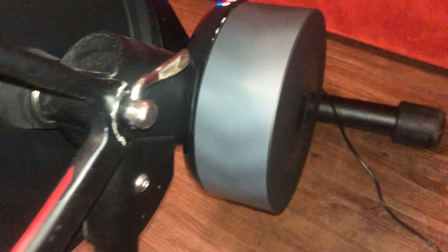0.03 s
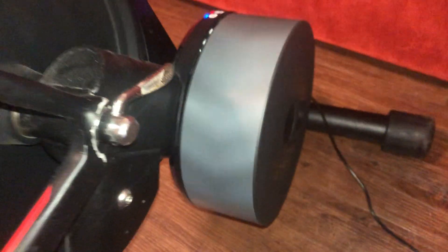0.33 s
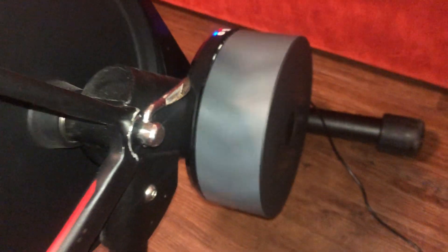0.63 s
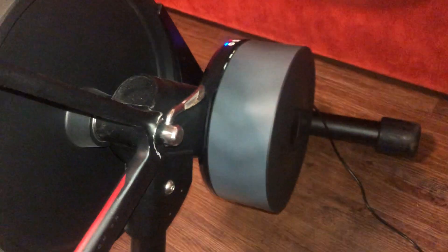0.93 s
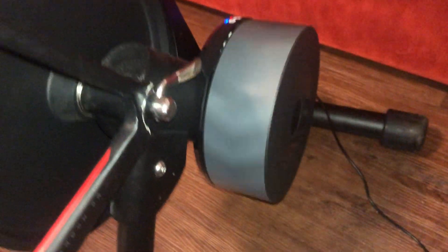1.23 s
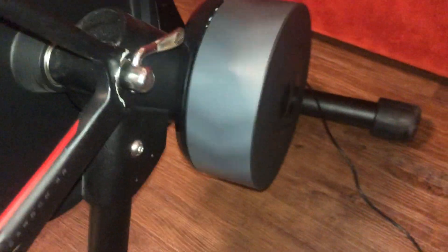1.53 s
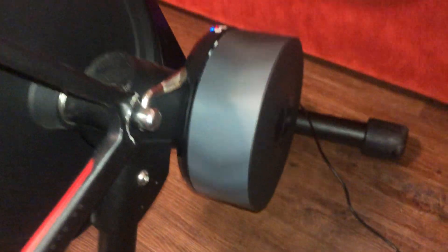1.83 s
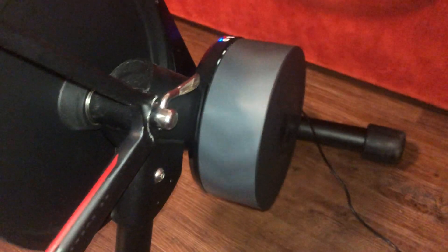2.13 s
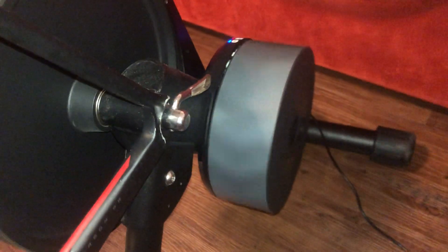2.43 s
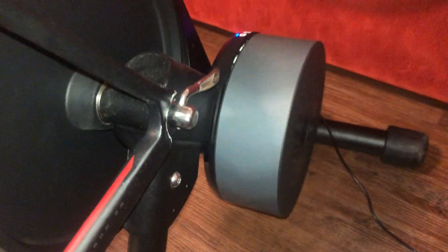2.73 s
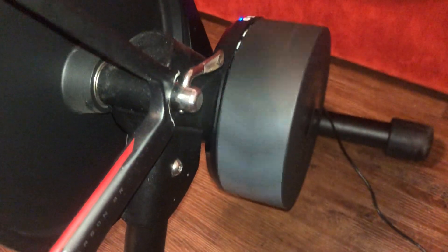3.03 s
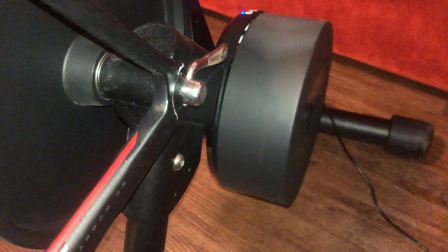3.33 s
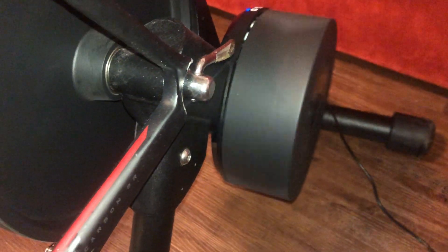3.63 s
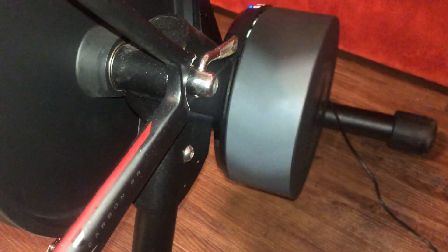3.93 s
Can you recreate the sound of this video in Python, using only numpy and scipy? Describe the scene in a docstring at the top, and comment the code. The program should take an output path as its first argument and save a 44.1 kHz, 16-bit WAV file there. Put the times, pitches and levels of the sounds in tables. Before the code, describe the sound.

Heard up close in a quiet room, a bike trainer flywheel whirs with a rapid, hissing rub while the chain clatters and the stand knocks. Then it coasts, pulsing slower and softer, ending with a dull bump.

```python
"""A quiet room, close to an indoor bicycle trainer: its flywheel spins about ten times a second, then slows.
Every turn rubs once: a hiss in the ringing frame, with a hollow resonance that swings up and back.
While it is driven the chain clacks two or three times a turn, grit ticks in the rub and the stand knocks.
The floor rumbles faintly underneath, and a dull bump comes at the end."""
import sys
import numpy as np
from scipy import signal
from scipy.fft import rfft, irfft
from scipy.io import wavfile

SR = 44100
rng = np.random.default_rng(int(sys.argv[2]) if len(sys.argv) > 2 else 0)


def master_out(mix):
    """Clip the mix to full scale and print it as 16-bit PCM to the path in sys.argv[1]."""
    frames = np.transpose(np.atleast_2d(mix))
    ceiling = np.clip(frames, -1, 1)
    pcm = np.round(ceiling * 32767).astype(np.int16)
    wavfile.write(sys.argv[1], SR, pcm)


N = 176400
T, HZ = np.arange(N) / SR, np.fft.rfftfreq(N, 1 / SR)
# bright spectrum of the squeezed contact and of grit in it: f/Hz, level/dB
SQUEEZE_SPECTRUM = [(1000, -28), (3500, -21), (4200, -63), (4900, -3), (5700, 0), (6500, 3), (7600, -4),
                    (10000, -9), (15500, -24)]


def amp(db):
    """Decibels to gain."""
    return 10 ** (np.asarray(db) / 20)


def unit(x):
    """Scales to rms 1."""
    return x / np.sqrt(np.mean(abs(x) ** 2) + 1e-20)


def curve(table, column=1):
    """One column of a table as an envelope over time."""
    rows = np.array(table)
    return np.interp(T, rows[:, 0], rows[:, column])


def wander(rate_hz):
    """Smooth random modulation of rms 1, rolling off above a rate."""
    return unit(irfft(rfft(rng.standard_normal(N)) / (1 + (HZ / rate_hz) ** 4), N))


def noise(envelope, spectrum, lift_db=0):
    """Enveloped noise, coloured by a minimum-phase EQ of unit power."""
    source = envelope * rng.standard_normal(N)
    hz, db = np.transpose(spectrum)
    gain = unit(amp(np.interp(np.log(HZ + 1), np.log(hz), db) + lift_db))
    cepstrum = irfft(np.log(gain + 1e-6), N)
    cepstrum[1:N // 2] *= 2  # folded, so that nothing rings ahead of an attack
    cepstrum[N // 2 + 1:] = 0
    impulse = irfft(np.exp(rfft(cepstrum)), N)[:SR // 10]
    return signal.fftconvolve(source, impulse)[:N]


def resonate(x, hz, width_hz):
    """A resonance that follows the curve hz, at rms 1."""
    carrier = np.exp(2j * np.pi * np.cumsum(hz) / SR)
    pole = np.exp(-np.pi * width_hz / SR)
    baseband = signal.lfilter([(1 - pole) ** 2], [1, -2 * pole, pole * pole], x / carrier)
    return unit((carrier * baseband).real)


def burst(start, db, decay_s):
    """Envelope of a brief contact: half-millisecond attack, exponential tail."""
    age = np.maximum(T - start, 0)
    return amp(db) * (1 - np.exp(-age * 2000)) * np.exp(-np.minimum(age / decay_s, 50))


def strike(start, modes, rise_s):
    """A blow sets modes ringing, each slightly off its usual pitch."""
    age = np.arange(SR // 3) / SR
    ring, out = np.zeros(len(age)), np.zeros(N + SR)
    for hz, db, t60 in modes:
        detuned_hz = hz * (1 + 0.014 * rng.uniform(-0.74, 1))
        ring += amp(db - 60 * age / t60) * np.sin(2 * np.pi * detuned_hz * age)
    out[round(start * SR):][:len(age)] = ring * np.minimum(age / rise_s, 1)
    return out[:N]


def room_tone():
    """The steady noise bed of the quiet room."""
    # room spectrum: f/Hz, level/dB
    spectrum = [(20, -38), (90, -9.5), (300, -5.5), (900, -6.5), (3000, -9), (15000, -13.5)]
    return noise(amp(-58), spectrum)


def floor_rumble():
    """Low rumble swells and sinks through the floor."""
    # rumble envelope: t/s, level/dB
    swells = [(0, -67), (.62, -74), (.73, -54), (.85, -68), (1.14, -67), (1.21, -46), (1.35, -67),
              (1.65, -61), (2.1, -69), (2.27, -59), (2.45, -66), (3.1, -77), (4, -73)]
    # rumble spectrum: f/Hz, level/dB
    spectrum = [(18, -25), (30, -22), (47, -3.5), (90, 1), (170, -5.5), (300, -14.5), (700, -10),
                (3000, -67)]
    return noise(amp(curve(swells)), spectrum)


def bump():
    """A soft blow rings a few low modes."""
    # thud modes: f/Hz, level/dB, t60/s
    modes = [(63.6, -47, 0.52), (95, -33.5, 0.32), (190.5, -32.5, 0.14), (220, -21.5, 0.035),
             (298, -40.5, 0.1)]
    return strike(3.908, modes, rise_s=0.0065)


def frame_colour():
    """The body's EQ in dB: frame and wheel resonances, finely rippled by near reflections."""
    # peaks and notches: f/Hz, width/Hz, lift/dB
    resonances = [(527, 97, 5), (1128, 82, 4), (1370, 66, -0.5), (1788, 48, 10), (2560, 85, -1),
                  (2900, 200, 4), (3240, 160, -3), (4465, 130, 7), (4480, 100, 0.5), (5050, 390, 5),
                  (5780, 310, 5), (6400, 150, -2), (6550, 190, 3), (6870, 150, -3), (7930, 173, -10),
                  (8110, 310, 3.5), (8600, 160, -5), (9390, 410, 4), (10220, 170, -1), (10330, 130, 8),
                  (11040, 300, 3.5), (11900, 240, 3.5), (12500, 220, -7), (13630, 400, 5), (14350, 300, -7),
                  (15600, 400, -1)]
    peaks = sum(db / (1 + (2 * (HZ - hz) / width) ** 2) for hz, width, db in resonances)
    ripple = np.interp(HZ / 75, np.arange(N), rng.standard_normal(N))  # a new value every 75 Hz
    return peaks + 1.6 * ripple


def stand_knocks(body_db):
    """The stand knocks: dull bursts through the frame."""
    # knocks: t/s, relative level/dB, decay/s
    hits = [(0.613, 1, 0.013), (.738, -5.5, .025), (.835, -14, .006), (1.154, 3, 0.0032),
            (1.178, -1.5, 0.02), (1.534, 4, 0.0077), (1.62, -9.5, 0.013), (1.659, 3.5, 0.0054),
            (1.683, 0, 0.0051), (1.702, -9.5, 0.026), (2.197, -3, 0.016), (2.22, -5.5, 0.041),
            (2.287, -4, 0.016)]
    # knock spectrum: f/Hz, level/dB
    spectrum = [(30, -27), (80, -9), (180, -13), (300, 0.5), (420, -9), (650, -14), (1500, -15.5),
                (6000, -48)]
    force = sum(burst(start, db - 39.5, decay_s) for start, db, decay_s in hits)
    return noise(force, spectrum, body_db)


def grit(body_db):
    """Grit caught in the rub gives sharp, bright ticks."""
    # ticks: t/s, relative level/dB
    ticks = [(0.019, -2.5), (.226, -9), (.357, -7), (.814, -12), (.880, -3), (1.111, -10), (1.224, 1.5),
             (1.326, 2.5), (1.407, -15), (1.5, -21), (1.909, -5), (2.126, -2.5)]
    force = sum(burst(start, db - 24.5, decay_s=0.003) for start, db in ticks)
    return noise(force, SQUEEZE_SPECTRUM, body_db)


def chain(body_db):
    """Each clack is a rough contact into the frame plus a short metallic ring."""
    # clacks: t/s, relative level/dB
    clacks = [(0.031, -6), (0.062, -24), (0.149, -3.5), (0.263, -10), (0.295, -5), (.373, 0), (0.411, -0.5),
              (0.457, -3), (.494, -4), (.569, -10), (.636, -2), (.754, -8), (0.795, -5.5), (0.833, -5.5),
              (0.906, -8.5), (.973, -1.5), (1.043, -9), (1.084, -4.5), (1.122, -2.5), (1.158, -2),
              (1.192, 1), (1.336, -4), (1.487, -6.5), (1.537, -22), (1.564, -3), (1.695, 1), (1.734, -6),
              (1.772, -0.5), (1.812, -1.5), (1.854, -2.5), (1.889, -11), (1.96, -5), (2.032, -4.5),
              (2.109, -11), (2.149, -29), (2.193, -7), (2.229, -18), (2.284, -3), (2.374, -3.5),
              (2.445, -11), (2.487, -4.5), (2.529, -4.5), (2.570, -5), (2.650, -8.5), (2.761, -13),
              (3.913, -12)]
    # contact spectrum: f/Hz, level/dB
    spectrum = [(150, -35), (480, -5.5), (600, -12.5), (780, -7), (1100, -1), (1350, -1), (1650, -14),
                (2200, 0.5), (3000, -14), (5000, -39), (15000, -39)]
    # metal modes: f/Hz, relative level/dB, t60/s
    modes = [(543, -8.5, 0.039), (1101, -2, 0.058), (1196, -5, 0.027), (1361, -2, 0.044), (1580, -4, 0.038),
             (2050, -8, 0.018), (3020, -10, .025)]
    rise_s = 0.003017
    force = sum(burst(start, db - 39.5, decay_s=0.0049) for start, db in clacks)
    ring = sum(amp(db - 33) * strike(start - rise_s, modes, rise_s) for start, db in clacks)
    return noise(force, spectrum, body_db) + ring


def flywheel(body_db):
    """Each turn squeezes, hisses and scuffs over a rolling roar; frame modes sing in and out."""
    # spin: t/s, speed/(turns per s)
    speed = [(0, 10.35), (0.6, 9.77), (1.3, 10.38), (2.1, 9.79), (2.65, 9.65), (3.2, 7.39), (4, 5.17)]
    # layer envelopes: t/s, hiss/dB, squeeze/dB, scuff/dB, roar/dB
    levels = [(0, -36, -41.5, -46, -39.5), (.35, -35.5, -38.5, -41.5, -39), (.6, -35.5, -44, -45.5, -40.5),
              (.85, -36.5, -40, -53, -42.5), (1.3, -36, -40, -54, -44), (1.75, -36.5, -36.5, -55, -41.5),
              (2.1, -37.5, -44, -56, -43), (2.6, -38, -43.5, -62, -45), (2.9, -40, -44, -53, -49),
              (3.15, -43, -70, -58, -52.5), (3.5, -47, -53, -56, -60), (3.72, -49.5, -66, -60, -58.5),
              (4, -50.5, -67, -74, -75)]
    # one rub cycle: phase/turns, hiss/dB, squeeze/dB, scuff/dB, hollow resonance/Hz
    turn = np.array([(0, -3.5, -18, -11, 1795), (.07, -3, -5.5, -14, 1850), (.15, -2.5, 4, -17, 2040),
                     (.32, 1, -1, -11, 2286), (.48, 1, -2, 1, 2096), (.66, -1, -9, 9, 2036),
                     (.73, -1, -58, -0.5, 2030), (.82, 0, -4.5, -10, 2030), (.88, -6.5, -4, -4, 1840)])
    # spectra of the airy hiss, raspy scuff and broad roar: f/Hz, level/dB
    hiss_spectrum = [(300, -30.5), (800, -15), (1600, -11.5), (2500, -12.5), (4000, -14.5), (5500, -4.5),
                     (7200, 0), (7900, 0.5), (9200, 1), (10000, -5.5), (12000, -3.5), (14500, -6.5),
                     (15600, -2)]
    scuff_spectrum = [(300, -8), (520, -8), (780, -11.5), (1100, 0), (1500, -3.5), (2600, -4.5), (3300, 2),
                      (3850, 7.5), (4800, -10.5), (7000, -27), (8700, -24), (9400, 11), (10100, -13),
                      (15000, -0.5)]
    roar_spectrum = [(30, -48), (120, -14.5), (300, -13), (520, -6.5), (750, -9.5), (1100, -5), (1750, -2),
                     (2450, -3), (3000, -1), (4200, 1.5), (6500, -5), (8000, -7.5), (15000, -12)]
    # singing frame modes: f/Hz, width/Hz, loudest at t/s, spread/s, base level/dB
    singing_modes = [(5140, 150, 0.33, 0.29, -44.5), (6590, 190, 0.31, 0.25, -43),
                     (9330, 580, 0.22, 0.24, -47), (4540, 150, 2.22, 0.14, -45.5),
                     (6560, 270, 1.37, 0.27, -44.5), (5830, 280, 1.7, 0.25, -46.5),
                     (9540, 330, 2.35, .8, -53.5)]
    # envelope of the hollow resonance: t/s, base level/dB
    hollow_level = [(0, -44.5), (.5, -48), (1.2, -51), (2.3, -49.5), (2.8, -53.5), (3.2, -57.5),
                    (3.6, -63.5), (4, -63)]

    phase = np.cumsum(curve(speed)) / SR % 1
    hiss_db, squeeze_db, scuff_db, hollow_hz = (
        np.interp(phase, turn[:, 0], column, period=1) for column in turn.T[1:])
    chatter_db = 3 * np.cos(2 * np.pi * 5 * (phase - 0.15))  # five peaks a turn
    flutter_hz, grain_hz = 107, 700
    roughness_db = 0.5 * wander(flutter_hz) + wander(grain_hz)

    def friction(db, flutter_db):
        """Envelope of a rub: the contact's shared roughness plus a flutter of its own."""
        return amp(db + roughness_db + flutter_db * wander(flutter_hz))

    out = noise(friction(curve(levels, 1) + hiss_db, flutter_db=1.46), hiss_spectrum, body_db)
    out += noise(friction(curve(levels, 2) + squeeze_db, flutter_db=0.2), SQUEEZE_SPECTRUM, body_db)
    out += noise(friction(curve(levels, 3) + scuff_db, flutter_db=1.4), scuff_spectrum, body_db)
    out += noise(friction(curve(levels, 4), flutter_db=2.02), roar_spectrum, body_db)
    for hz, width_hz, peak_s, spread_s, db in singing_modes:
        swell = np.exp(-((T - peak_s) / spread_s) ** 2 / 2)
        drive = rng.standard_normal(N) * friction(chatter_db, flutter_db=3)
        ring = resonate(drive, np.full(N, hz), width_hz)
        out += swell * ring * amp(db + 0.8 * hiss_db)  # pulses with the hiss
    drive = rng.standard_normal(N) * friction(0, flutter_db=2)
    hollow = resonate(drive, hollow_hz, width_hz=340)
    return out + hollow * amp(curve(hollow_level) + 0.39 * scuff_db)  # pulses gently with the scuff


def scene():
    """The trainer up close over the room's bed, in mono."""
    body_db = frame_colour()
    trainer = flywheel(body_db) + chain(body_db) + grit(body_db) + stand_knocks(body_db)
    return (trainer + bump() + floor_rumble() + room_tone())[None]


def record(dry):
    """A steep low-pass trims the top octave above 15.78 kHz."""
    lowpass = signal.firwin(801, 15780, window=("kaiser", 9), fs=SR)
    return signal.oaconvolve(dry, lowpass[None], "same")


dry = scene()
out = record(dry)
master_out(out)
```